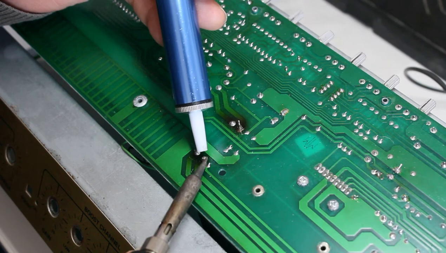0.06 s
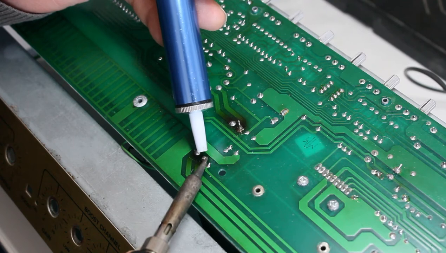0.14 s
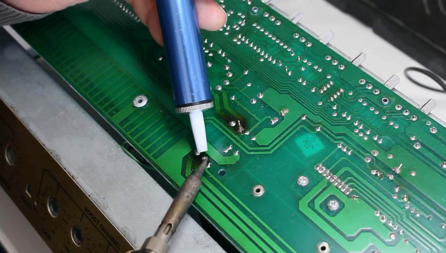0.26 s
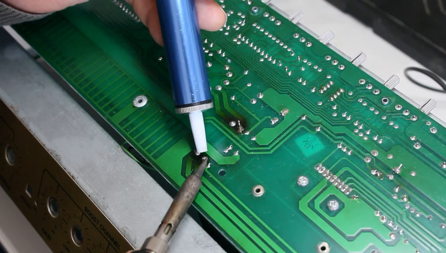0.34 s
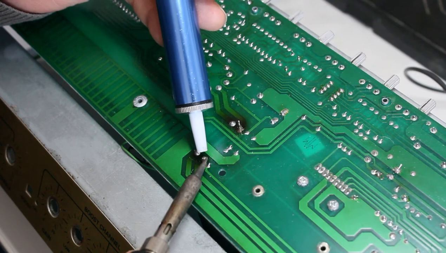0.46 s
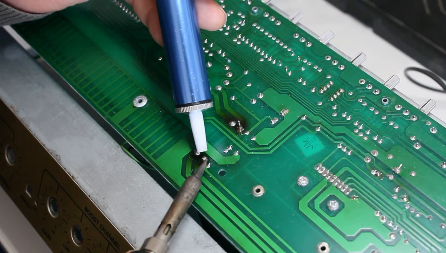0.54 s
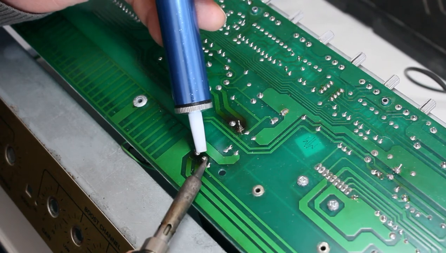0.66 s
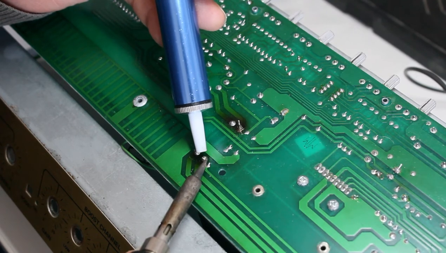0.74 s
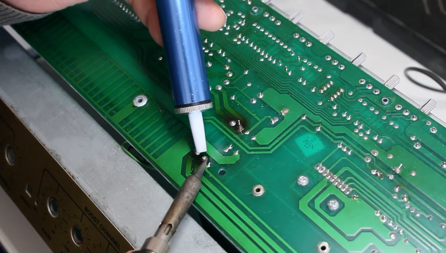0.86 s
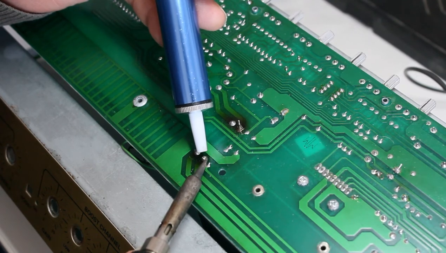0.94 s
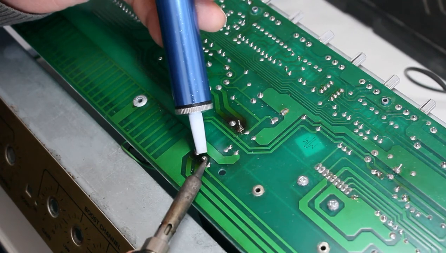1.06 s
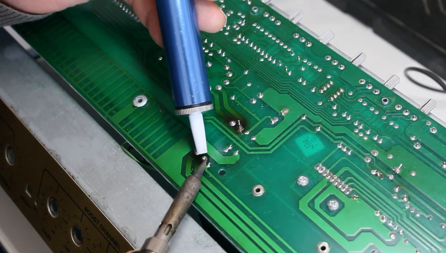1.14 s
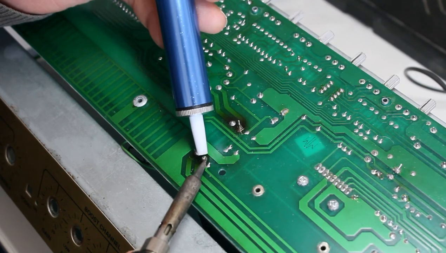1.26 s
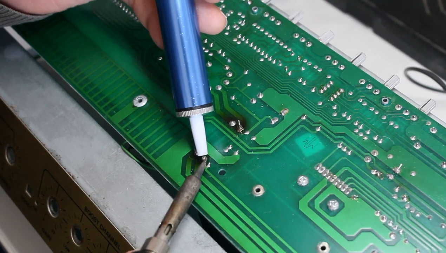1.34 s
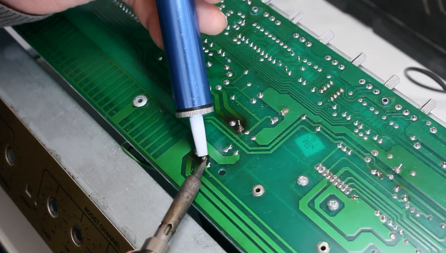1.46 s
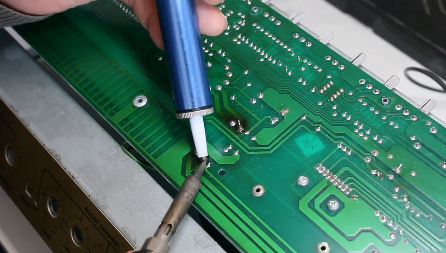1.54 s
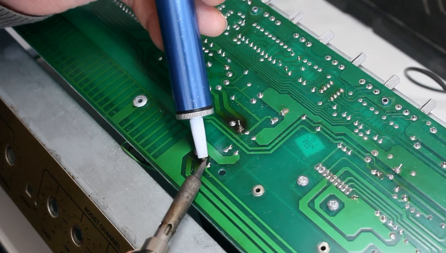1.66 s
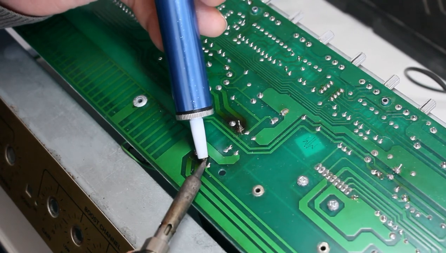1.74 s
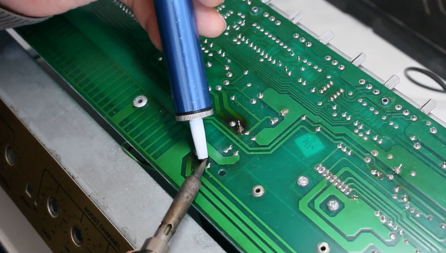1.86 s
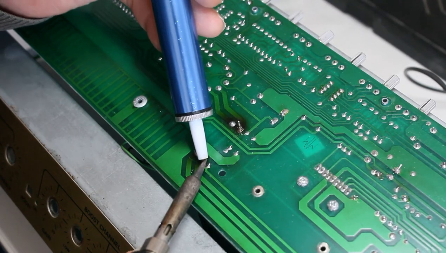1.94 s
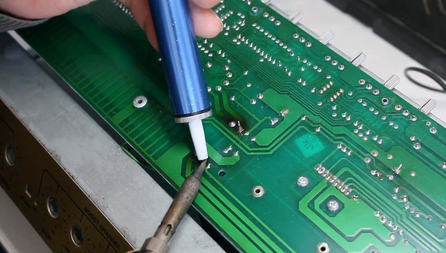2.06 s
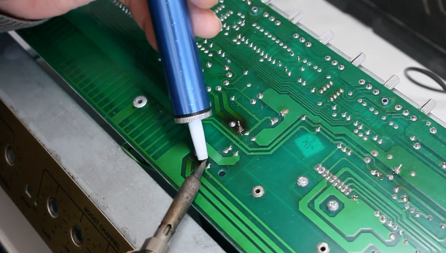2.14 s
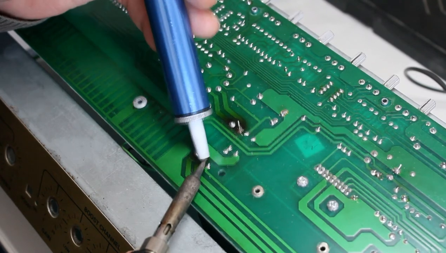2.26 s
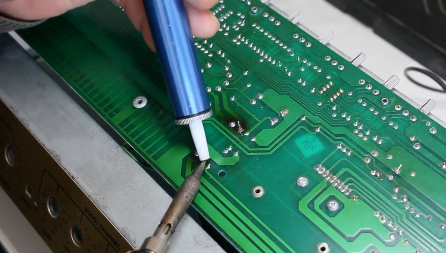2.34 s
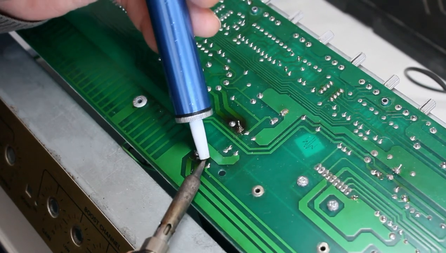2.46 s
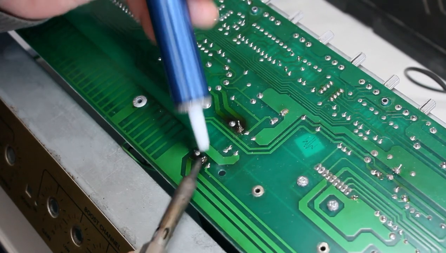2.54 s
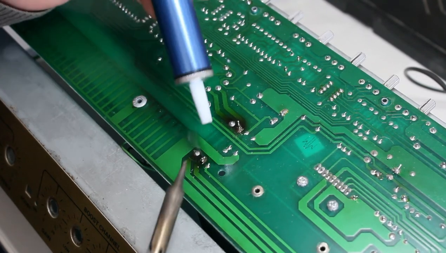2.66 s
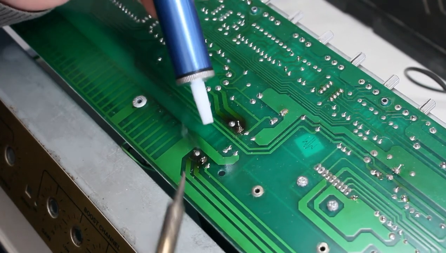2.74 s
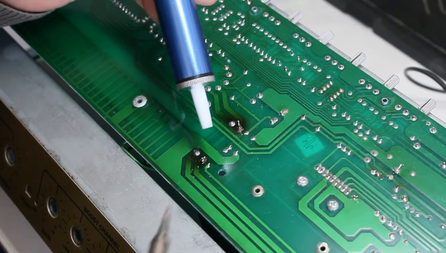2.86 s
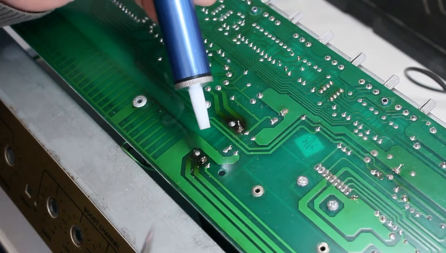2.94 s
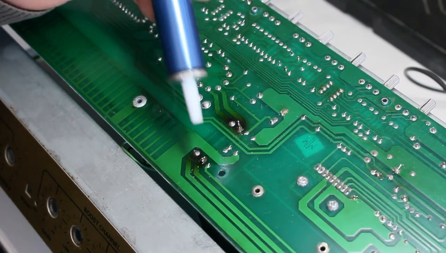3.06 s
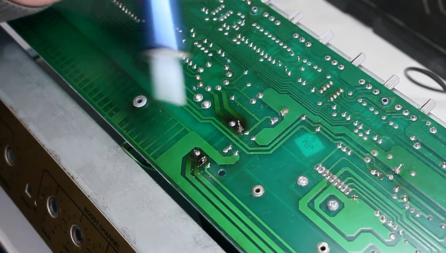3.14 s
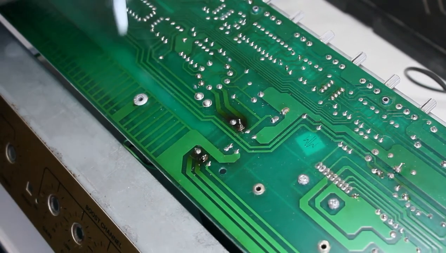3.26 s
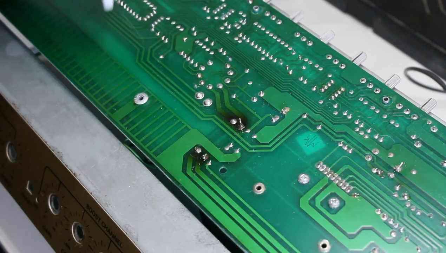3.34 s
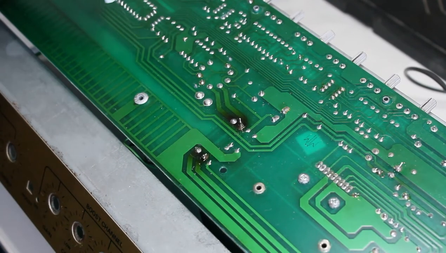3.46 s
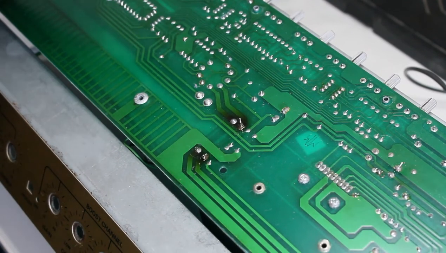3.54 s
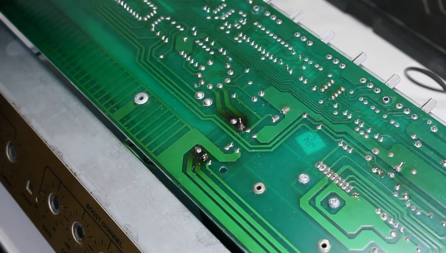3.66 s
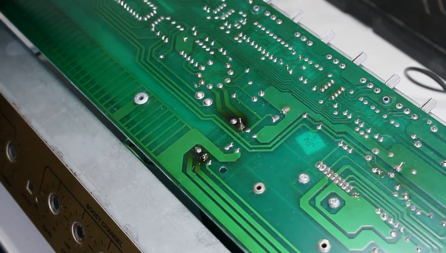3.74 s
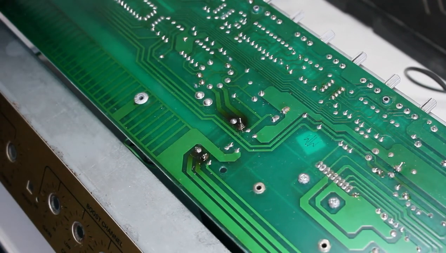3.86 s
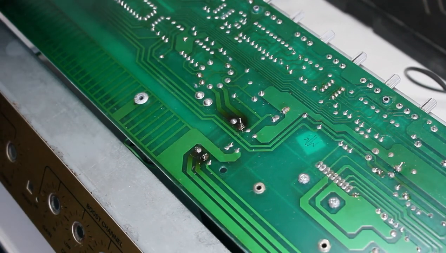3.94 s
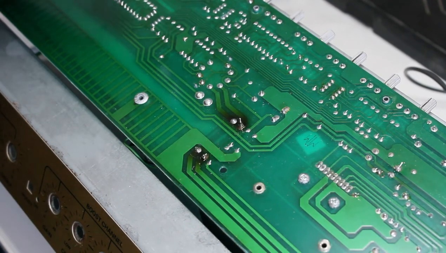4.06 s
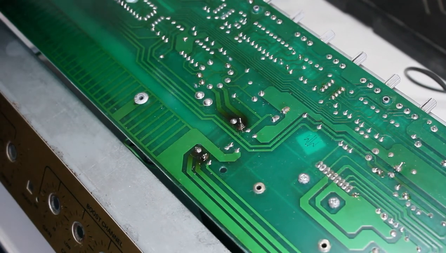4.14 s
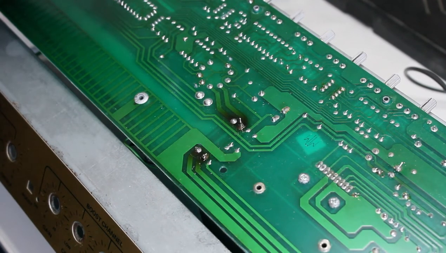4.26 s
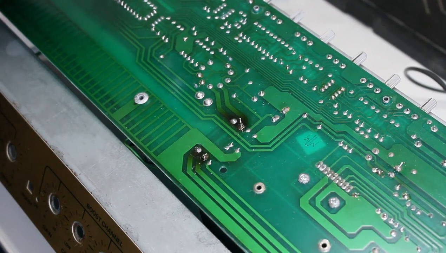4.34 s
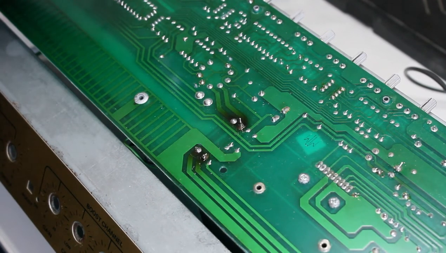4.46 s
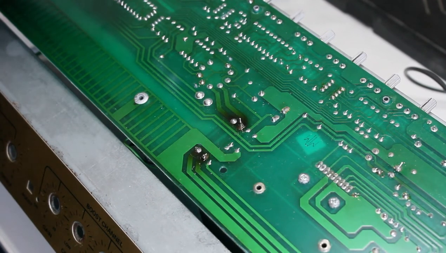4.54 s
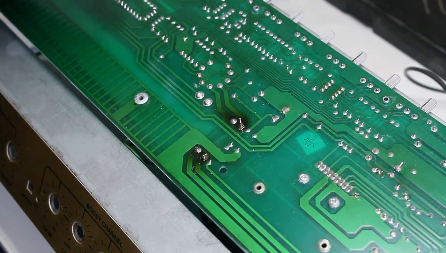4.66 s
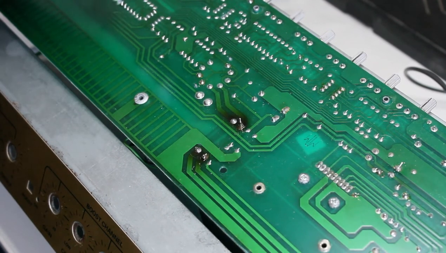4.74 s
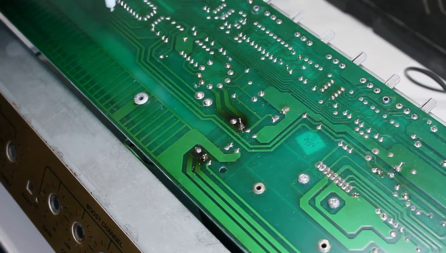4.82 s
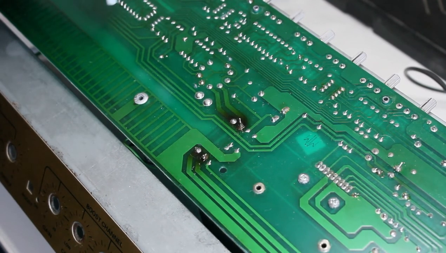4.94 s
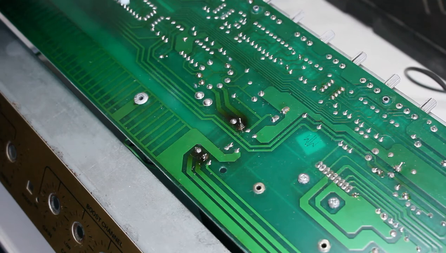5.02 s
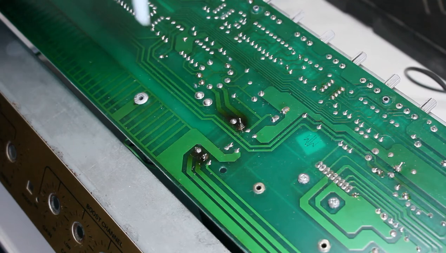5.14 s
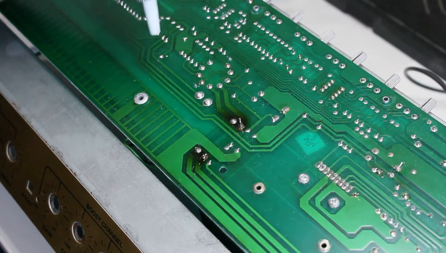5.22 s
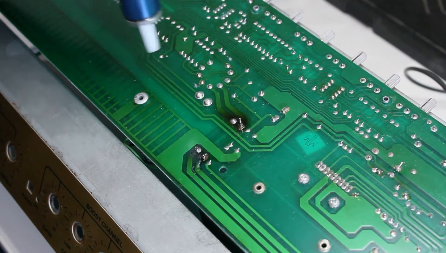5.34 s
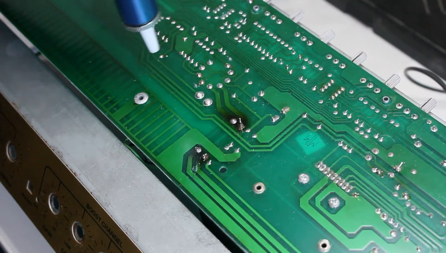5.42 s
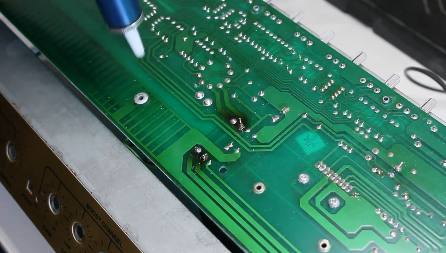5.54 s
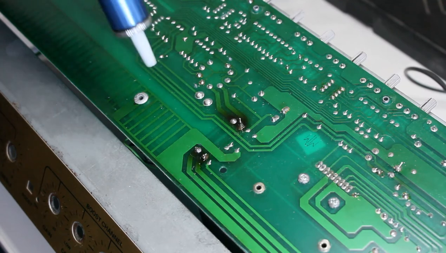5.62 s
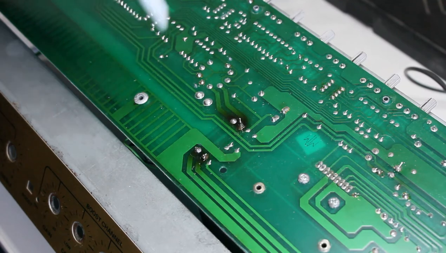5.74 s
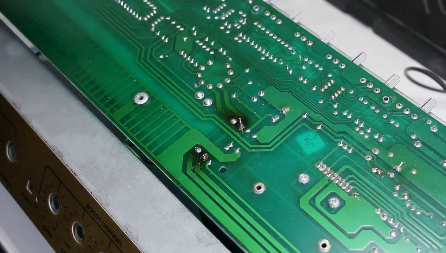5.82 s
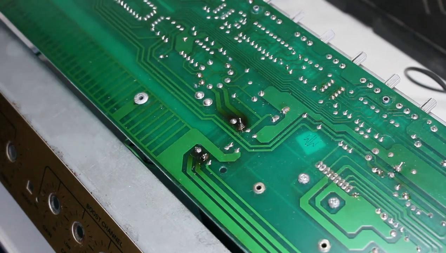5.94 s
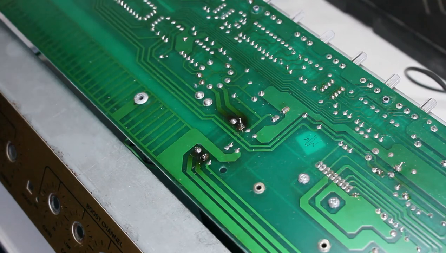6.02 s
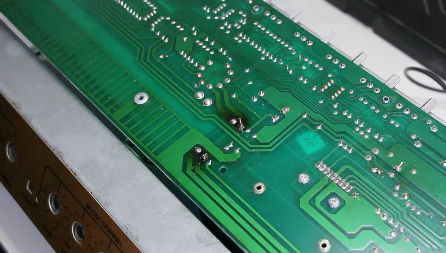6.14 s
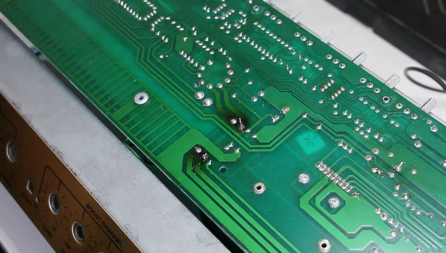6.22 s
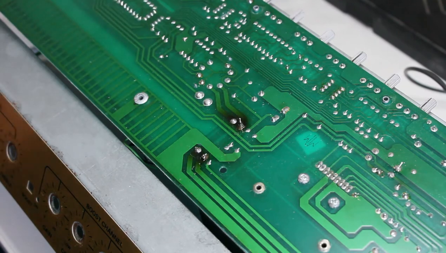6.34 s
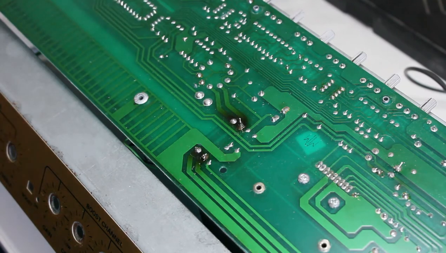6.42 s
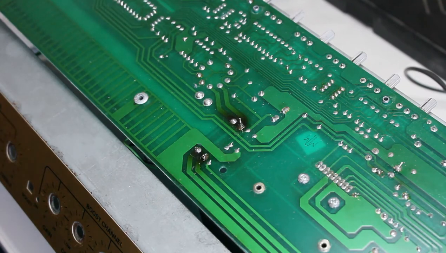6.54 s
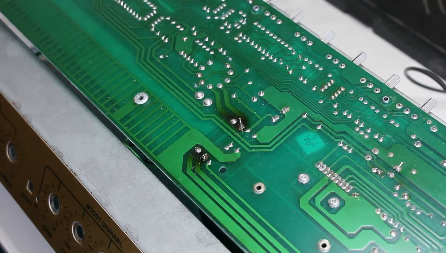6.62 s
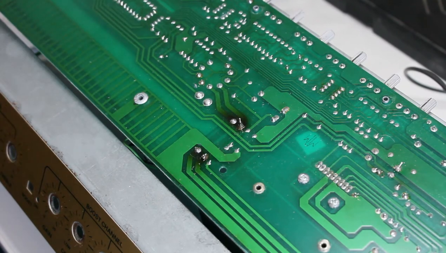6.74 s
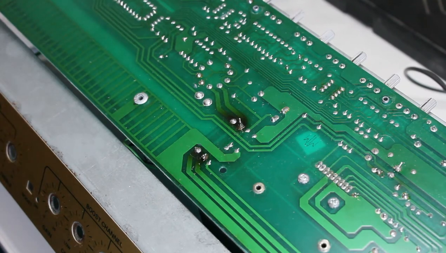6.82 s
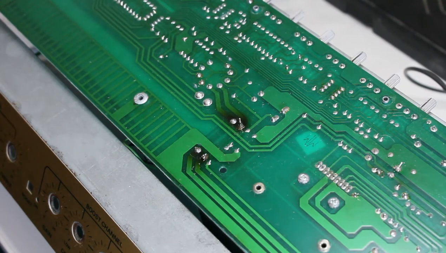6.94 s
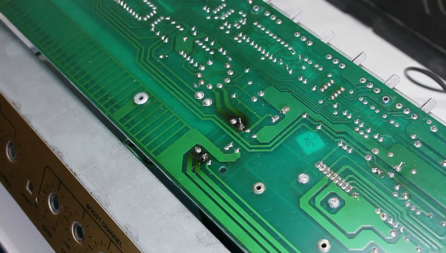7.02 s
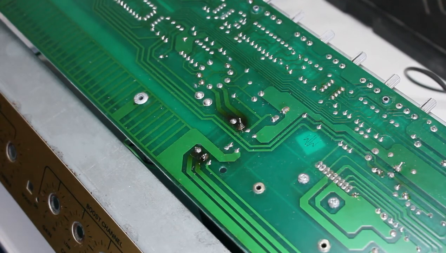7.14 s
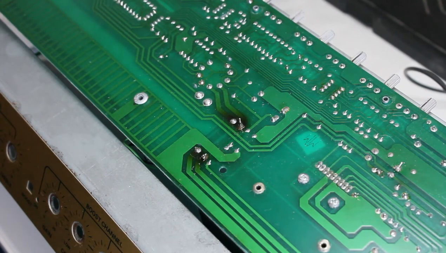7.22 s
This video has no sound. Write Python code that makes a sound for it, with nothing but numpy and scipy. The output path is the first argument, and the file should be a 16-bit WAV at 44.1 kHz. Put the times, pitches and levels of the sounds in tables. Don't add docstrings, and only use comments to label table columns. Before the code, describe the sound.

A spring-loaded desoldering pump fires with a sharp snap and air suck, is re-cocked through loud plastic-metal clicks, then knocks down on a bench.

```python
import sys
import numpy as np
from scipy import signal
from scipy.fft import rfft, irfft
from scipy.io import wavfile
from scipy.ndimage import uniform_filter1d

SR = 44100
rng = np.random.default_rng(int(sys.argv[2]) if len(sys.argv) > 2 else 0)


def boost(x):
    u = np.asarray(x, float) / 20
    return 10 ** u


def file_out(sig):
    cols = np.atleast_2d(sig).T
    lim = np.clip(cols, -1, 1)
    pcm = np.round(lim * 32767).astype(np.int16)
    wavfile.write(sys.argv[1], SR, pcm)


N = 321048


def unit(x):
    return x / np.sqrt(np.mean(x ** 2) + 1e-20)


def band(x, lo_hz, hi_hz, order=2):
    return signal.sosfilt(signal.butter(order, [lo_hz, min(hi_hz, .45 * SR)], "band", fs=SR, output="sos"), x)


def at_hz(points, hz):
    points = np.array(points)
    return np.interp(np.log(hz), np.log(points[:, 0]), points[:, 1])


def coloured(spectrum):
    hz = np.maximum(np.fft.rfftfreq(N, 1 / SR), 1)
    return unit(irfft(rfft(rng.standard_normal(N)) * boost(at_hz(spectrum, hz)), N))


def flicker(rate, depth_db):
    steps = rng.standard_normal(400)
    return boost(depth_db * np.interp(np.arange(N) / SR * rate % 399, np.arange(400), steps))


def add(out, s, x):
    i = round(s * SR)
    out[i:i + len(x)] += x[:N - i]


def crack(noise, lo_hz, hi_hz, t60):
    t = np.arange(len(noise)) / SR
    x = band(noise * boost(-60 * t / t60), lo_hz, hi_hz)
    return x / np.abs(x).max()


def swell(start, fullest, end, db):
    edge_db, bend = -18, 1.73
    out, t = np.zeros(N), np.arange(start, end, 1 / SR)
    away = np.interp(t, [start, fullest, end], [1, 0, 1])
    add(out, start, boost(db + edge_db * away ** bend) * np.minimum(10 * (1 - away), 1))
    return out


# pitch_hz, density_db
HUM_SPECTRUM = [(12, -33.5), (20, -9.5), (138, -1), (270, -8), (388, -10), (472, -7), (590, -14),
                (642, -17), (1060, -9.5), (2460, -12.5), (6910, -19), (7520, -19), (13200, -33),
                (16000, -48)]
# pitch_hz, level_db
WHISTLES = [(5351, -83.5), (7472, -84.5), (10713, -94), (12700, -93.5)]
# time_s, level_db
HANDLING = [(0, -57.5), (.6, -59), (1.2, -56.5), (1.9, -60), (2.6, -56.5), (2.72, -63.5), (2.8, -56),
            (3.55, -52), (3.88, -60), (4.03, -53.5), (4.58, -57), (4.72, -77.5), (4.95, -54), (5.3, -59),
            (5.86, -54), (6.1, -56.5), (7.16, -56), (7.28, -53)]
# start_s, fullest_s, end_s, level_db
ARM_LEANS = [
    (.3, 0.632, 0.81, -60),
    (1.1, 1.6, 2.3, -64.5),
    (1.905, 2.25, 3.3, -56.5),
    (2.552, 3.003, 3.8, -56),
    (4.35, 4.586, 5, -58.5),
    (4.75, 4.95, 5.6, -73),
    (6.001, 6.8, 6.9, -59.5),
]


def background():
    t = np.arange(N) / SR
    unsteady = flicker(rate=60, depth_db=3)
    whistle = unsteady * sum(boost(db + 8.5) * np.sin(2 * np.pi * hz * t) for hz, db in WHISTLES)
    rustle = unit(band(rng.standard_normal(N), 180, 815)) * flicker(rate=21, depth_db=2.5)
    deep = unit(band(rng.standard_normal(N), 59.8, 205)) * flicker(rate=9, depth_db=-1)
    handling = boost(np.interp(t, *np.transpose(HANDLING)))
    leaning = boost(-76) + sum(swell(*row) for row in ARM_LEANS)
    hiss = boost(-71.5) * rng.standard_normal(N)
    return boost(-56) * coloured(HUM_SPECTRUM) + hiss + whistle + boost(-2.5) * (handling * rustle + leaning * deep)


# start_s, peak_db, body_hz, bright_db, wood_db (last two relative)
TOOL_KNOCKS = [(0.585, -30.5, 680, -25, -11), (0.595, -18.5, 1550, -49, -15),
               (1.257, -31.5, 510, 3.5, -10.5), (2.011, -41, 460, -5, -10), (2.3065, -8.5, 860.2, -20, -28),
               (2.322, -12, 1500, -22, -24), (2.583, -31.5, 1470, -20, -13), (4.7262, -21, 1000, -29, -34),
               (2.594, -31, 620, -25, -14.5), (5.915, -37, 1000, -12, -14), (6.964, -13, 1100, -36.5, -11),
               (6.971, -11, 1690, -40, -13), (7.21, -40.5, 340, -14, -19)]
# start_s, peak_db, body_hz, bright_db (relative), t60_s
LIGHT_TAPS = [
    (.5958, -21, 2600, -14, .07),
    (1.2575, -35, 3000, -4, .04),
    (2.7885, -42, 1500, -15, .006),
    (4.965, -28, 300, -30, .03),
    (5.7128, -40, 700, -25, .008),
    (6.9608, -15, 1700, -22, .015),
]
# pitch_hz, width_hz, level_db
BENCH_MODES = [(388, 91, -9), (657, 130, -6), (1063, 160, -5.5), (1790, 230, -5.5), (2238, 280, -16),
               (2800, 2100, -8)]


def knocks():
    out = np.zeros(N)
    blows = [(*row, .02) for row in TOOL_KNOCKS]
    blows += [(*row[:4], -39, row[4]) for row in LIGHT_TAPS]
    for s, peak_db, hz, bright_db, wood_db, t60 in blows:
        noise, luck = rng.standard_normal((4, 8000)), rng.standard_normal(12)
        blow = boost(-10) * crack(noise[0], 230, 3200, t60)
        blow = blow + boost(-5.5) * crack(noise[1], hz / 1.243, hz * 1.23, t60)
        blow = blow + boost(bright_db) * crack(noise[2], 3013, 11000, t60=.0052)
        rattle = 0
        for k, (f, width, db) in enumerate(BENCH_MODES):
            rattle = rattle + boost(db + .53 * luck[k]) * crack(noise[3], f - width / 2, f + width / 2, t60=.19)
        add(out, s, boost(peak_db) * (blow + boost(wood_db) * rattle))
    return out


# start_s, fullest_s, end_s, level_db, low_hz, high_hz
NOISE_SWELLS = [(3.926, 3.953, 3.971, -45, 6000, 13600), (2.63, 2.69, 2.74, -66, 7500, 9900),
                (6.85, 6.93, 6.98, -46, 2400, 4900), (6.77, 6.85, 7.02, -55, 5000, 15000),
                (.59, .62, .74, -54, 1400, 3000), (2.4, 2.48, 2.58, -60, 1500, 7500),
                (4.49, 4.58, 4.66, -59, 230, 380), (7.17, 7.25, 7.33, -60, 7000, 15000),
                (4.949, 4.96, 4.972, -30, 2000, 7400), (4.303, 4.312, 4.316, -34, 7000, 13500),
                (6.78, 6.88, 6.97, -54, 1800, 7000), (6.19, 6.22, 6.28, -62, 1900, 3000)]
# start_s, fullest_s, end_s, level_db, pitch_hz
DRAG_SQUEAKS = [
    (2.573, 2.647, 3, -65.5, 2500),
    (2.576, 2.66, 2.76, -66, 5100),
    (2.6, 2.68, 2.75, -68, 4400),
    (2.6, 2.67, 2.74, -68, 9600),
    (6.25, 6.48, 6.65, -61, 2360),
    (6.42, 6.48, 6.54, -64, 4020),
]


def squeaks():
    noise = rng.standard_normal(N) * flicker(rate=45, depth_db=2)
    out = sum(swell(*row) * unit(band(noise, lo_hz, hi_hz, order=3)) for *row, lo_hz, hi_hz in NOISE_SWELLS)
    for *row, hz in DRAG_SQUEAKS:
        out = out + swell(*row) * unit(band(noise, hz - 55, hz + 55))
    return out


# start_s, pitch_hz, width_hz,
# peak_db, t60_s
STRUCK_PARTS = [(.596, 440, 31.48, -46.5, 0.44), (1.257, 490, 65.74, -47.5, 0.25),
                (2.322, 6590, 110, -10, 0.06), (2.322, 4900, 700, -28, 0.16),
                (2.324, 10380, 442, -12, 0.036), (2.33, 2510, 110, -62, 0.31), (2.589, 445, 90, -47, 0.52),
                (2.42, 2540, 110, -60, 0.5), (3.291, 7340, 280.8, -49.5, 0.13),
                (3.697, 6470, 162, -19, 0.11), (3.698, 3550, 1400, -22, 0.22),
                (3.764, 7730, 149, -35.5, 0.075), (4.168, 3870, 1188, -31.5, 0.34),
                (4.314, 8040, 4320, -37.5, 0.29), (4.728, 1673, 1111, -31, 0.16),
                (4.728, 4670, 1500, -32, 0.17), (4.313, 4480, 905, -35, 0.33), (4.314, 2600, 2000, -39, .2),
                (4.236, 5200, 900, -32, .1), (.812, 7600, 400, -52.5, 0.067),
                (4.964, 1180, 596, -22, 0.042), (7.223, 139, 23.9, -41, 0.22),
                (4.964, 2740, 60, -34, .3),
    (6.968, 1730, 90, -29, .2),
    (6.972, 1186, 28, -29, .25),
    (6.962, 2930, 60, -38, .22),
    (6.966, 560, 200, -33, .16),
                (2.335, 6650, 200, -35, 0.23), (2.31, 9900, 2400, -30, 0.19), (4.736, 3000, 120, -41, 0.28),
               (4.729, 8000, 3300, -29, 0.088), (3.698, 9800, 5000, -27, 0.13),
               (6.962, 1700, 32, -29.5, 0.18), (6.962, 1060, 82, -29, 0.066), (6.963, 1810, 60, -36, 0.25),
               (4.966, 3600, 400, -39, .2), (4.966, 5200, 900, -38, .17), (4.966, 9000, 5000, -37, .2),
               (6.965, 840, 120, -36, .2), (6.965, 330, 100, -36, .25), (6.965, 2120, 90, -40, .25),
               (2.31, 10200, 500, -17, .06), (2.31, 6900, 500, -14, .02), (2.2985, 2500, 3000, -42, .04)]


def rings():
    out, t = np.zeros(N), np.arange(SR // 3) / SR
    for s, hz, width, peak_db, t60 in STRUCK_PARTS:
        blurred = unit(band(rng.standard_normal(SR), hz - width / 2, hz + width / 2)[-len(t):])
        blur = min(width / 140, 1)
        pure = 1.4 * np.exp(-width / 200) * np.sin(2 * np.pi * hz * t)
        add(out, s, boost(peak_db - 60 * t / t60) * (blur * blurred + pure))
    return out


# start_s, peak_db, barrel_hz, cap_hz, cap_db (relative)
LATCH_CLICKS = [(2.592, -28, 4417, 8100, -14), (3.6287, -17.5, 3570, 6400, -31),
                (3.6444, -29, 3260, 6450, -24), (3.7644, -22, 3040, 7550, -1),
                (3.8423, -27.5, 3650, 6300, -34), (3.8574, -32, 3180, 6230, -35),
                (4.121, -17, 3710, 6160, -14), (4.127, -21, 3400, 6240, -17.5),
                (4.207, -26, 3560, 8000, -14.5), (4.219, -35, 4000, 8950, -8), (4.2296, -29, 3500, 9500, 1),
                (4.2319, -21, 2300, 9000, 2.5), (4.247, -23, 5100, 6500, -10), (4.311, -28, 4500, 8450, -1)]
# start_s, peak_db, barrel_hz, cap_hz, cap_db (relative)
FIRING_CLICKS = [
    (2.2972, -24, 4000, 6000, -6),
    (2.3098, -10, 4200, 8700, 8),
    (2.3214, -9, 1700, 6600, 0),
    (2.3229, -6, 5000, 10200, 5),
    (2.3337, -16, 4800, 10500, 0),
]
# start_s, peak_db, barrel_hz, cap_db (relative)
SPRING_CATCHES = [(2.5778, -33, 2800, -21), (4.6241, -26, 2540, -22), (4.6353, -25, 2650, -27),
                  (4.644, -22.5, 2770, -22), (4.6634, -24, 2500, -8), (4.6741, -16, 2640, -9.5),
                  (4.743, -21, 2600, -16), (4.9513, -30, 3600, -17), (4.955, -31, 2960, -15),
                  (4.9585, -20, 2800, -22), (4.962, -8, 2800, -22), (5.2669, -39, 2990, -15),
                  (6.76, -35, 2900, -22)]
# start_s, peak_db, barrel_hz, cap_hz
LOOSE_TICKS = [(.8114, -54, 6940, 7300), (2.433, -52.5, 5100, 7040), (2.451, -47, 5000, 7500),
               (2.4927, -48, 5500, 6740), (2.507, -57, 5020, 6860), (2.558, -48, 3000, 6090),
               (2.6206, -46, 5000, 6800), (2.6337, -46, 5000, 6800), (3.2907, -38.5, 4100, 7200),
               (3.39, -42, 5200, 6040), (3.4586, -44, 2310, 7800), (3.562, -53, 4000, 9040),
               (3.6006, -41, 2600, 8260), (3.6724, -41, 8500, 12100), (5.0282, -36, 9000, 10300),
               (5.251, -46, 5240, 7980), (5.508, -53, 4940, 7000), (5.8169, -33, 5900, 9500)]
# start_s, peak_db, direction
PISTON_PUSHES = [
    (2.3227, -10.5, 1),
    (2.788, -34, -1),
    (3.697, -18.5, 1),
    (4.729, -37, 1),
    (4.964, -22.5, 1),
]


def contacts():
    rows = [(*row, -19) for row in LATCH_CLICKS] + [(*row, -13.5) for row in FIRING_CLICKS]
    rows += [(s, db, hz, 7500, cap_db, -15.5) for s, db, hz, cap_db in SPRING_CATCHES]
    rows += [(*row, 1, -4) for row in LOOSE_TICKS]
    return rows


def pump_clicks():
    out = np.zeros(N)
    for s, peak_db, barrel_hz, cap_hz, cap_db, grip_db in contacts():
        noise = rng.standard_normal((7, 4000))
        barrel = boost(-2.5) * crack(noise[0], barrel_hz / 1.192, barrel_hz * 1.05, t60=.0038)
        barrel = barrel + crack(noise[1], barrel_hz / 1.45, barrel_hz * 1.8, t60=.0045)
        barrel = barrel + boost(-12.5) * crack(noise[2], barrel_hz / 1.38, barrel_hz * 1.4, t60=.05)
        cap = boost(-6) * crack(noise[3], cap_hz / 1.1, cap_hz * 1.1, t60=.008)
        cap = cap + crack(noise[4], cap_hz / 1.35, cap_hz * 1.3, t60=.005)
        cap = cap + boost(-22) * crack(noise[5], 5510, 8800, t60=.038)
        grip = crack(noise[6], 800, 2085, t60=.0075)
        add(out, s + .0005, boost(peak_db) * (boost(-1) * barrel + boost(cap_db + 2.5) * cap + boost(grip_db) * grip))
    for s, peak_db, way in PISTON_PUSHES:
        add(out, s, np.sign(way) * boost(peak_db) * crack(np.ones(4000), 70, 1100, t60=.0014))
    return out


# pitch_hz, density_db
NOZZLE_SPECTRUM = [(120, -40), (200, -2.5), (1940, -13), (3900, -1.5), (4430, -9.5), (5330, 1.5),
                   (5940, -11.5), (6640, -4.5), (7140, -12), (10300, -8), (16000, -46)]


def suction():
    start_s, shut_s, rise_s = 2.3105, 2.338, .002
    leak_db, leak_t60_s = -21, .025
    t = np.arange(N) / SR
    gusts = flicker(rate=300, depth_db=2)
    rush_db = 60 * np.minimum((t - start_s) / rise_s, 0)
    flow_db = np.where(t < shut_s, rush_db, leak_db - 60 * (t - shut_s) / leak_t60_s)
    return boost(-15.5) * boost(np.maximum(flow_db, -200)) * coloured(NOZZLE_SPECTRUM) * gusts


# start_s, peak_db, low_hz, high_hz, t60_s
SMALL_TICKS = [(2.3216, 1, 900, 5600, .007), (2.3337, 1, 3200, 6200, .005),
               (4.1212, -24, 6000, 12500, .005), (2.568, -47, 5000, 10500, .01),
               (2.604, -48, 4500, 9000, .012), (2.6215, -49, 9200, 10200, .012),
               (2.6345, -48, 9200, 10200, .012), (2.654, -49, 6000, 10000, .01),
               (2.671, -51, 9000, 10200, .012), (2.686, -47, 5500, 10000, .01),
               (2.700, -49, 7800, 10200, .012), (2.706, -49, 7800, 10200, .012),
               (2.713, -50, 5000, 9000, .012), (2.725, -48, 5000, 10200, .01),
               (2.788, -38, 700, 2500, .006), (4.957, -27, 6500, 8500, .01),
               (4.970, -36, 9500, 13500, .008), (4.9742, -24, 9500, 12200, .012),
               (4.9775, -32, 9500, 12200, .008), (4.982, -37, 9500, 12500, .008),
               (4.986, -37, 9500, 13500, .008), (4.991, -35, 9500, 12000, .014),
               (4.997, -40, 9000, 12500, .008), (5.036, -50, 9500, 10800, .012),
               (5.7125, -33, 150, 1450, .012), (5.884, -48, 3000, 9500, .03),
               (6.274, -52, 8000, 14000, .05)]


def tinks():
    out = np.zeros(N)
    for s, peak_db, lo_hz, hi_hz, t60 in SMALL_TICKS:
        add(out, s, boost(peak_db) * crack(rng.standard_normal(3000), lo_hz, hi_hz, t60))
    return out


# start_s, fullest_s, end_s, scrape_db, hiss_db (relative)
RUBBING_STROKES = [(2.555, 2.6, 2.75, -63, 3), (3.097, 3.253, 3.41, -56, -3),
                   (3.295, 3.447, 3.605, -54.5, -6.5), (3.45, 3.634, 4.3, -58, -3),
                   (4.737, 4.844, 5.24, -58, -10), (4.507, 4.554, 4.81, -56, 13),
                   (4.576, 4.725, 4.73, -40.5, 1), (5.095, 5.206, 5.36, -59, -5),
                   (5.257, 5.268, 5.34, -50.5, -18), (5.9, 5.925, 5.975, -48, -2),
                   (6.082, 6.27, 6.64, -56, -8.5), (6.343, 6.618, 7.05, -58, -8.5),
                   (6.76, 6.83, 6.92, -56, 3), (6.84, 6.945, 7.06, -52, 6), (7.0, 7.1, 7.22, -60, 0),
                   (7.154, 7.27, 7.45, -51, 0)]


def slides():
    slips = rng.random(N) < 900 / SR
    grain = boost(3.5 * np.minimum(rng.exponential(1, N), 4)) * slips
    rub = rng.standard_normal((2, N)) * (1 + .85 * grain) * flicker(rate=36, depth_db=2)
    scrape = unit(band(rub[0], 950, 4060) + .27 * band(rub[0], 2130, 2550))
    hiss = unit(band(rub[1], 3360, 10400, order=3))
    return sum(swell(*row) * (scrape + boost(hiss_db) * hiss) for *row, hiss_db in RUBBING_STROKES)


# start_s, peak_db, rattle_db, crack_db (last two relative)
LOUD_SNAPS = [
    (3.6876, -10, -17, 7),
    (3.6966, 2.5, -18, 0),
    (4.1675, -0.5, -19, 0),
    (4.235, -0.5, -16.5, 0),
    (4.3133, -7, -15, 4),
    (4.4814, -14.5, -21, 5),
    (4.6981, -5, -15, -11),
    (4.7262, 5, -24.5, 4),
    (4.9606, -6, -26, -14),
    (4.9636, -3, -20, 0),
]
# pitch_hz, width_hz, level_db
SNAP_MODES = [
    [(1230, 250, -13), (3440, 270, -17), (5030, 280, -15), (8400, 700, 0), (11100, 800, -1)],
    [(2900, 500, -5), (3800, 500, 0), (5450, 300, -14), (6430, 270, -3), (7360, 440, -8), (9140, 240, -12),
     (11000, 250, -15)],
    [(3440, 520, 0), (5130, 800, -5), (6160, 310, -9), (7310, 360, -9), (8160, 630, -1), (9260, 420, -6),
     (10500, 530, -5), (11700, 260, -14)],
    [(2370, 300, -9), (3480, 430, -4), (5110, 380, -2), (6370, 460, -4), (8480, 410, -1), (8980, 420, -1),
     (10400, 320, -8), (11900, 280, -8)],
    [(1900, 300, -17), (2900, 500, -13), (3850, 230, -1), (4610, 280, 0), (5820, 480, -3), (7320, 250, -8),
     (8290, 370, -5), (9420, 460, -1), (10500, 320, -9), (12100, 280, -10)],
    [(2760, 270, -5), (3770, 270, 0), (6180, 620, -2), (7180, 380, -4), (8370, 700, 0), (9110, 430, -5),
     (10400, 320, -5), (12600, 320, -18)],
    [(1000, 230, -16), (1900, 400, -8), (2770, 430, 0), (3870, 270, 0), (4720, 470, -9), (6000, 400, -20)],
    [(1700, 600, -4), (2810, 310, 0), (3870, 400, 0), (4900, 450, -5), (6200, 500, -10), (7370, 500, -3),
     (8970, 600, -1), (10200, 500, -7), (11300, 500, -16)],
    [(2750, 300, 0), (3900, 400, -12)],
    [(1100, 500, -2), (2000, 500, -4), (3000, 500, -4), (4000, 500, -3), (5200, 500, -8), (6500, 500, -9),
     (8000, 500, -7), (10000, 500, -12)],
]


def snaps():
    contact_s, scatter_s = .0022, .0004
    out, t = np.zeros(N), np.arange(6000) / SR
    for (s, peak_db, rattle_db, crack_db), parts in zip(LOUD_SNAPS, SNAP_MODES):
        strike, rattle = 0, 0
        for hz, width, db in parts:
            late = np.maximum(t - scatter_s * rng.random(), 0)
            noise = rng.standard_normal(len(t))
            driven = np.sin(np.pi * np.minimum(late / contact_s, 1) ** .48) ** 2
            ringing = boost(-11) * np.minimum(2 * late / contact_s, 1) * np.exp(-np.pi * width * late)
            strike = strike + boost(db) * (driven + ringing) * np.sin(2 * np.pi * hz * late)
            rattle = rattle + boost(db) * crack(noise, hz - width, hz + width, t60=.05)
        sharp = boost(-11 + crack_db) * crack(rng.standard_normal(len(t)), 1000, 12500, t60=.004)
        body = (strike + boost(rattle_db + 6.5) * rattle) / np.abs(strike).max()
        add(out, s, boost(peak_db) * (body + sharp))
    return out


# pitch_hz, t60_s
ROOM_DECAY = [(100, 0.33), (500, 0.1394), (2500, 0.17), (5000, 0.24), (10000, 0.088), (16000, 0.085)]


def room(x):
    t, tail = np.arange(SR // 2) / SR, 0
    edges = 80 * 2 ** np.arange(8.5)
    for lo, hi in zip(edges, edges[1:]):
        decay = boost(-60 * t / at_hz(ROOM_DECAY, np.sqrt(lo * hi)))
        tail = tail + band(rng.standard_normal(len(t)), lo, hi) * decay
    tail = tail * (t > .002)
    return signal.fftconvolve(x, tail / np.sqrt(np.sum(tail ** 2)))[:N]


def scene():
    blows = pump_clicks() + knocks() + snaps() + tinks()
    held = rings() + suction()
    reflections = boost(-13.5) * room(blows + boost(-10.5) * held)
    return (blows + held + reflections + slides() + squeaks() + background())[None]


def band_limit(x):
    return signal.sosfilt(signal.butter(12, 16430, fs=SR, output="sos"), x)


def record(dry):
    t = np.arange(N) / SR
    level_db = 10 * np.log10(uniform_filter1d(dry[0] ** 2, size=441) + 1e-12)
    wanted_db = .44 * np.maximum(level_db + 25, 0)
    release = 67
    hold = round(.12 * SR)
    kept_db = np.maximum(wanted_db, np.roll(wanted_db, hold))
    held_db = np.maximum.accumulate(kept_db + release * t) - release * t
    r = np.exp(-1 / (.026 * SR))
    cut_db = signal.lfilter([1 - r], [1, -r], held_db)
    capsule = signal.butter(4, 13800, fs=SR, output="sos")
    mix = np.clip(signal.sosfilt(capsule, dry) * boost(-cut_db), -1, 1)
    return band_limit(mix)


dry = scene()
out = record(dry)
file_out(out)
```